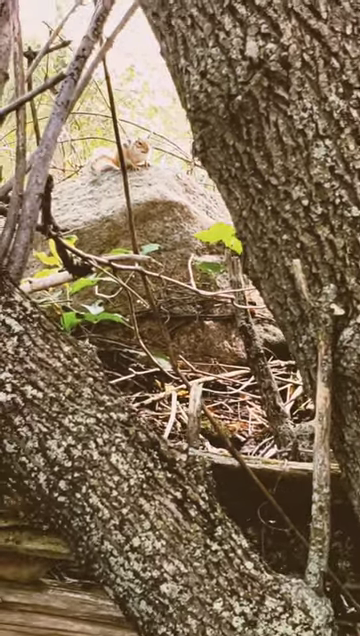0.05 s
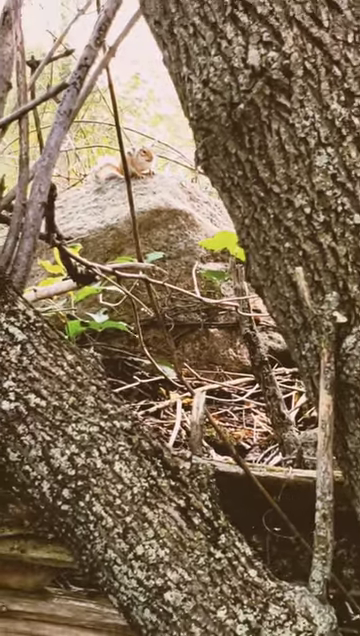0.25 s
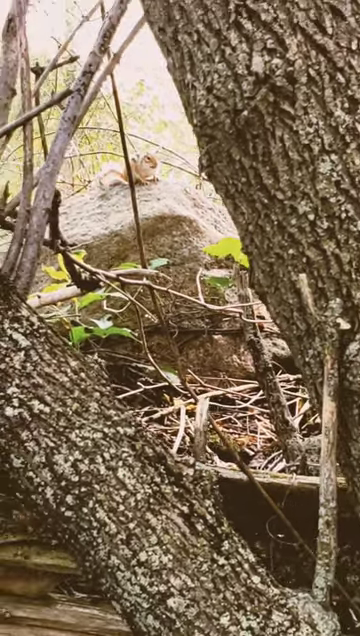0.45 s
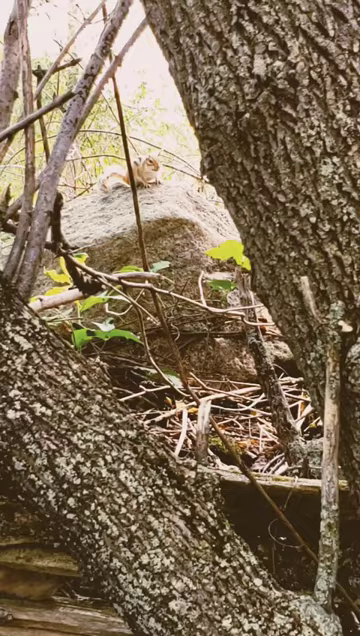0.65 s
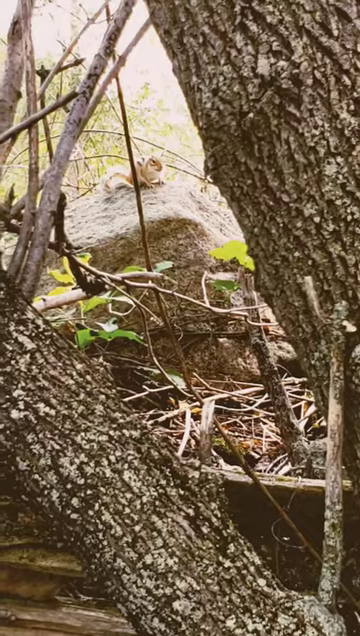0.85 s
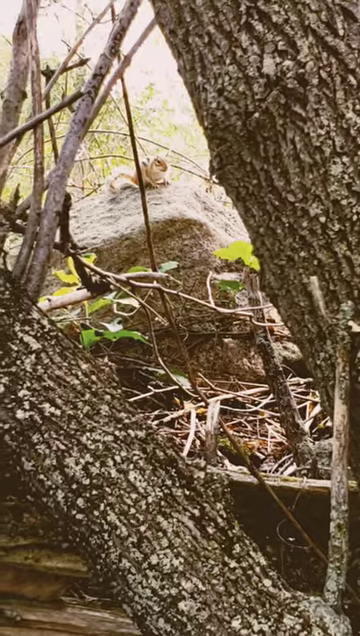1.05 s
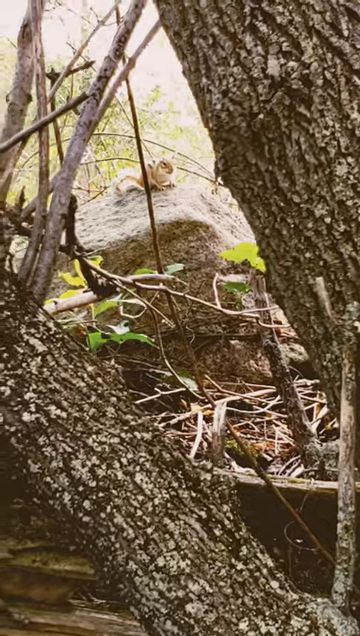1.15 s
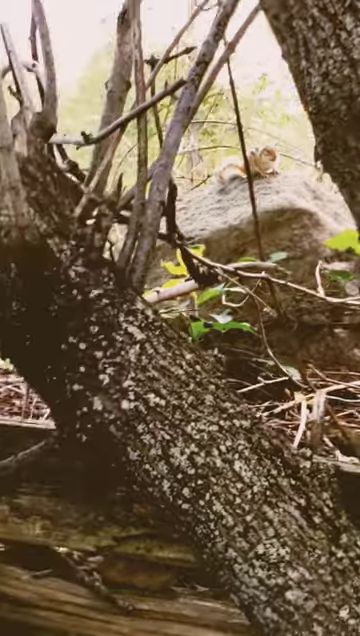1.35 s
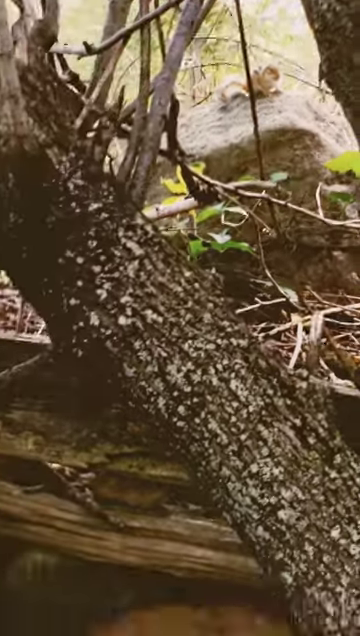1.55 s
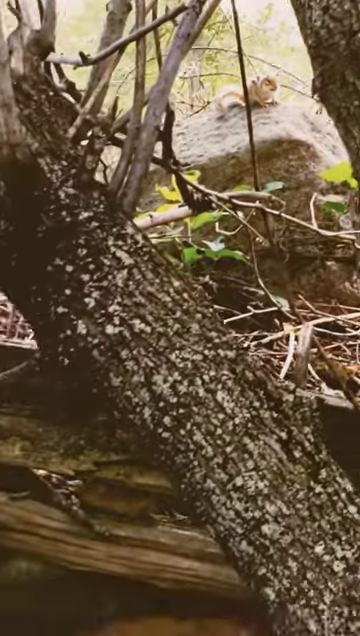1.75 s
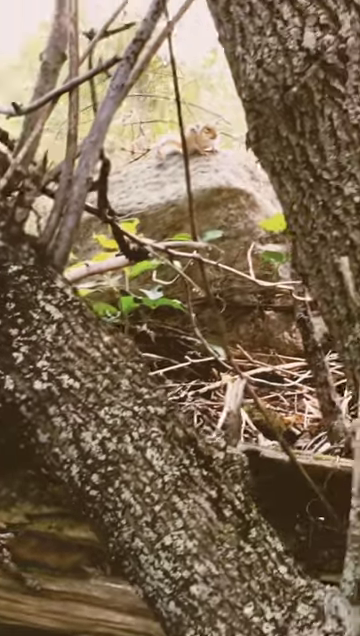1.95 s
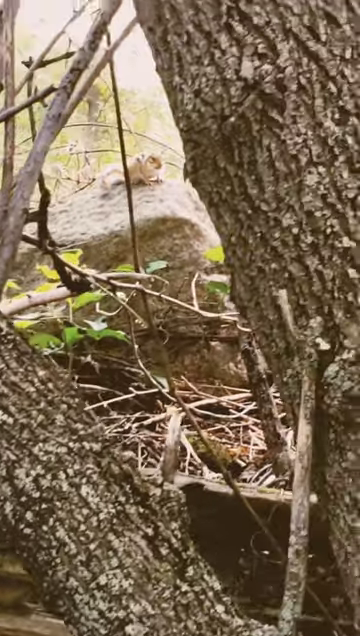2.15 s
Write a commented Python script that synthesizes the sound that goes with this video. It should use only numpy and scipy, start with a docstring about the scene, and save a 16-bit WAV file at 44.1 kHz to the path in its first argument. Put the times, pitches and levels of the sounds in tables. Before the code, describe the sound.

Five sharp chipmunk chips echo lightly through woodland, ending with a soft close rustle.

```python
"""Faint bird notes, then at once five sharp chips from a chipmunk on a woodland boulder. Each chip is a
whistle that plunges an octave in 25 ms, scattered by rock and trunks and trailed by a soft low note.
One thin squeak follows the first chip, and the distant bird keeps repeating its short notes.
Near the end something rustles close by, twigs tick and a hand bumps and scuffs the microphone,
all over a low hum and quiet forest air."""
import sys
import numpy as np
from scipy import signal
from scipy.fft import rfft, irfft
from scipy.io import wavfile
from scipy.ndimage import uniform_filter1d

SR = 44100
rng = np.random.default_rng(int(sys.argv[2]) if len(sys.argv) > 2 else 0)


def pcm_store(signal):
    """Save signal as 16-bit PCM."""
    levels = np.round(np.clip(np.atleast_2d(signal), -1, 1) * 32767)
    wavfile.write(sys.argv[1], SR, levels.astype(np.int16).T)


N = 97020

# chipmunk calls (time [s], level [dB], pitch [ratio], length [ratio])
CHIPS = [(0.2061, -18, 1.005, 1.0), (0.6267, -19.5, 1.014, 0.98), (1.0335, -18, 1, 0.99),
         (1.4302, -19, 1.005, 1.01), (1.8242, -18, 1.0, .99)]
# course of one chip (time from its start [ms], pitch [Hz], level [dB])
CHIP_CONTOUR = [(-3, 7400, -55), (1.5, 8250, -30), (3.5, 8300, -24), (9, 8000, -10), (12, 7200, 1),
                (15, 6100, -9.5), (18.5, 5150, 1), (22, 4500, -1), (25, 4152, -8.5), (28.5, 4054, -21)]
# hiss in the chipmunk's voice (frequency [Hz], level [dB])
RASP_SPECTRUM = [(300, -36), (1200, -15.5), (2200, -25.5), (3000, -20), (3700, -14), (4400, 1), (6000, -6),
                 (7700, 8.5), (9000, 0), (10500, -2.5), (12000, -25)]
# course of the squeak (time [s], pitch [Hz], level [dB])
SQUEAK_CONTOUR = [(.246, 9350, -41), (.252, 9250, -33), (.263, 9200, -30), (.273, 9550, -31),
                  (.279, 10200, -35), (0.284, 11300, -35), (.287, 8600, -45), (.297, 7050, -39),
                  (.301, 6800, -34)]
# note after each chip (time [s], level [dB], middle pitch [Hz], length [s])
LOW_NOTES = [(0.23, -52, 1223, 0.027), (0.653, -48.5, 1128, 0.024), (1.063, -50, 1100, 0.039),
             (1.462, -47, 1094, .014), (1.859, -48.5, 1030, 0.0141)]
# calls scattered by leaves and twigs (frequency [Hz], level [dB])
FOLIAGE_SPECTRUM = [(500, -45), (1100, -11), (1700, -22), (2500, -29.5), (3000, -10), (3600, -14.5),
                    (4400, 3), (6000, 8.5), (7500, -1), (9500, 1), (11000, -7.5), (12000, -26)]
# distant bird's song (time [s], length [s], top pitch [Hz], level [dB])
BIRD_NOTES = [(-.02, 0.054, 5700, -48.5), (.1, 0.032, 5460, -52.5), (0.198, 0.038, 5350, -55),
              (0.56, 0.029, 6190, -73), (0.78, 0.054, 5040, -60.5), (0.866, 0.044, 5464, -52.5),
              (0.979, .04, 4450, -62), (1.244, .04, 5370, -54), (1.347, 0.046, 5445, -52.5),
              (1.587, 0.04, 5413, -52.5), (1.723, 0.035, 5130, -57), (2.036, 0.047, 5820, -54.5)]
# hiss in its notes (frequency [Hz], level [dB])
BIRD_SPECTRUM = [(3000, -51), (4000, -11), (4600, -1), (5300, 11.5), (6100, -9), (7400, -8), (8500, -24),
                 (12000, -21)]
# envelope of the close rustle (time [s], left level [dB], right level [dB])
RUSTLE_ENVELOPE = [(1.55, -77, -67.5), (1.715, -71, -64.5), (1.74, -70, -51.5), (1.799, -69, -55),
                   (1.86, -56.5, -50), (1.92, -59, -50), (1.97, -51, -42.5), (2.005, -56, -46.5),
                   (2.02, -52, -50), (2.056, -47.5, -48), (2.12, -52.5, -49.5), (2.2, -57, -52)]
# its brushing noise (frequency [Hz], level [dB])
RUSTLE_SPECTRUM = [(100, -16), (300, 1), (550, 5.5), (850, 1.5), (1300, 1), (2000, -0.5), (3000, 2),
                   (5000, -3), (7500, 3), (10500, -2), (12000, -16)]
# faint stirring of leaves (time [s], length [s], level [dB])
LEAF_STIRS = [(0.456, 0.085, -62), (1.583, 0.13, -63)]
# their hiss (frequency [Hz], level [dB])
LEAF_SPECTRUM = [(2000, -39), (5000, -17), (7500, 2), (9500, 6), (12000, -10)]
# twig and handling ticks (time [s], level [dB], band centre [Hz], t60 [s], left minus right [dB])
TICKS = [(1.601, -43, 6300, 0.024, 6), (1.821, -39, 4900, 0.014, -13), (1.9345, -30.5, 6030, 0.0037, -9),
         (1.9376, -23, 4970, 0.0054, 13), (2.1734, -34.5, 860, 0.013, 9.5)]
# handling bumps (time [s], level [dB], pitch [Hz], t60 [s])
THUMPS = [(.764, -34.5, 88, 0.078), (1.791, -42.5, 55, 0.27), (2.194, -29.5, 104, 0.11)]
# friction of the hand (frequency [Hz], level [dB])
SCUFF_SPECTRUM = [(100, -8), (300, 3), (550, -2.5), (900, -7), (1400, -2), (2200, -29), (6000, -44)]
# partials of the hum (frequency [Hz], level [dB])
HUM_PARTIALS = [(59.2, -63), (118.4, -62.5), (215.3, -74.5)]
# forest air (frequency [Hz], level [dB])
AIR_SPECTRUM = [(20, -10), (35, -5.5), (60, 4.5), (90, -2), (160, -12.5), (300, -16), (520, -23),
                (800, -19), (1300, -33), (2200, -56.5), (3400, -40), (5000, -31), (7400, -26.5),
                (9500, -50.5), (11000, -40.5), (12000, -67)]
# low rumble (frequency [Hz], level [dB])
RUMBLE_SPECTRUM = [(20, -12), (45, 1.5), (75, 0), (150, -10), (400, -44), (2000, -78)]


def chipmunk(t):
    """Frequency modulation: each chip is a jittering, plunging whistle that rasps most where loudest."""
    ms, hz, contour_db = np.array(CHIP_CONTOUR).T
    times = ms / 1000
    rasp = undb(-11.5) * noise(RASP_SPECTRUM, channels=1)[0]
    jitter = 1 + 0.01345 * walk(1500)
    out = np.zeros(N)
    for start, db, pitch_ratio, stretch in CHIPS:
        age = (t - start) / stretch
        whistle = np.sin(phase(pitch_ratio * np.interp(age, times, hz) * jitter))
        effort = undb(np.interp(age, times, contour_db, left=-200, right=-200))
        out += undb(db) * effort * (whistle + effort / (effort + 0.25) * rasp)
    return out


def squeak(t):
    """A frequency glide: a very high, slightly hissy whistle curls upward and flicks down."""
    times, hz, db = np.array(SQUEAK_CONTOUR).T
    whistle = np.sin(phase(np.interp(t, times, hz) * (1 + 0.0044 * walk(900))))
    rasp = undb(-16.5) * noise(RASP_SPECTRUM, channels=1)[0]
    return undb(np.interp(t, times, db, left=-200, right=-200)) * (whistle + rasp)


def low_notes(t):
    """A soft downward linear sweep, roughened by random frequency modulation, trails each chip."""
    fall_hz_per_s = 9000
    out, waver = np.zeros(N), 1 + 0.1 * walk(500)
    for start, db, middle_hz, length in LOW_NOTES:
        progress = np.clip((t - start) / length, 0, 1)
        hz = middle_hz - fall_hz_per_s * length * (progress - 0.5)
        out += undb(db) * arch(progress) * np.sin(phase(waver * hz))
    return out


def woodland_echoes(calls):
    """Multipath reflection: the calls return from nearby rock, trunks, the far wood and foliage."""
    rock = echoes(calls, delay=0.0015, build=0.0015, t60=0.087, db=-2.56)
    trunks = echoes(calls, delay=0.015, build=1.07, t60=0.18, db=-13)
    # a negative t60 makes this faint echo swell until it stops, 1 s after the call
    far_wood = echoes(calls, delay=0.04, build=7, t60=-0.64, db=-29.5)
    return rock + (trunks + far_wood + foliage_scatter(calls)) * pan(2.4)


def foliage_scatter(calls):
    """Diffuse scattering: leaves and twigs blur the calls into a hiss that follows their energy."""
    age = np.arange(SR) / SR
    response = ((1 - np.exp(-age / 0.0093)) * decay(age, t60=0.24)) ** 2
    energy = np.maximum(signal.fftconvolve(calls ** 2, response / response.sum())[:N], 0)
    return undb(-12) * np.sqrt(energy) * noise(FOLIAGE_SPECTRUM)


def distant_bird(t):
    """Short notes scoop up to a held pitch; reverberation from the trees outweighs the direct sound."""
    scoop, rise_s = 0.06, 0.00684
    out, waver = np.zeros(N), 1 + 0.009 * walk(400)
    hiss = undb(-7) * noise(BIRD_SPECTRUM, channels=1)[0]
    for start, length, hz, db in BIRD_NOTES:
        age = np.maximum(t - start, 0)
        tone = np.sin(phase(hz * waver * (1 - scoop * np.exp(-age / rise_s))))
        out += undb(db) * np.sqrt(arch(age / length)) * (tone + hiss)
    trees = echoes(out, delay=0.002, build=0.0022, t60=0.32, db=1.5)
    return (undb(-2) * out + trees) * undb([[1.5], [-2]])


def ticks():
    """Impact excitation: each brief contact is a damped noise burst in a band around its own pitch."""
    edge_ratio = 1.43
    out, age = np.zeros((2, N + SR)), np.arange(SR // 10) / SR
    for start, db, hz, t60, pan_db in TICKS:
        mid, side = rng.standard_normal((2, len(age))) * decay(age, t60)
        band = signal.butter(2, [hz / edge_ratio, hz * edge_ratio], "band", fs=SR, output="sos")
        ring = signal.sosfilt(band, [mid + 0.5 * side, mid - 0.5 * side])
        onset = int(start * SR)
        out[:, onset:onset + len(age)] += ring / np.abs(ring).max() * undb(db) * pan(pan_db)
    return out[:, :N]


def thumps(t):
    """Damped oscillation: each soft handling bump is a low sinusoid that dies away."""
    out, attack_s = np.zeros(N), 0.0035
    for start, db, hz, t60 in THUMPS:
        age = np.maximum(t - start, 0)
        envelope = (1 - np.exp(-age / attack_s)) * decay(age, t60)
        out += undb(db) * envelope * np.sin(2 * np.pi * hz * age)
    return out


def rustle(t):
    """Random amplitude modulation gives grain to close brushing, first on the right, and faint leaves."""
    times, left_db, right_db = np.array(RUSTLE_ENVELOPE).T
    grain = unit_rms(undb(0.5 * walk(720) + 2.37 * walk(60.01)))
    envelope = undb([np.interp(t, times, left_db), np.interp(t, times, right_db)])
    brushing = envelope * unit_rms(flicker(noise(RUSTLE_SPECTRUM), depth_db=3, rate_hz=35.1))
    stirring = sum(undb(db) * arch((t - start) / length) for start, length, db in LEAF_STIRS)
    return grain * (brushing + stirring * noise(LEAF_SPECTRUM))


def hand_scuff(t):
    """Friction noise: a hand slides over the microphone in one dull swell."""
    start_s, length_s = 2.12, 0.098
    return undb(-54) * arch((t - start_s) / length_s) * noise(SCUFF_SPECTRUM)


def hum():
    """Superposition of three low partials, each wavering in level and pitch."""
    out = np.zeros(N)
    for hz, db in HUM_PARTIALS:
        amplitude = np.sqrt(2) * undb(db + 2 * walk(14))
        out += amplitude * np.sin(phase(hz * (1 + 0.0188 * walk(18))))
    return out


def forest_air():
    """Correlation between the ears sets width: the air is narrow in the bass and wide in the treble."""
    air = flicker(noise(AIR_SPECTRUM), depth_db=2, rate_hz=10.02)
    bass = signal.sosfilt(signal.butter(1, 960, fs=SR, output="sos"), air)
    mid, side = bass
    narrow = np.array([mid + 0.2 * side, mid - 0.2 * side]) * pan(2.2)
    wide = (air - bass) * pan(9.5)
    return undb(-59) * (narrow + wide)


def echoes(x, delay, build, t60, db):
    """Convolution with 1 s of dense random reflections, different at each ear; times in seconds."""
    age = np.maximum(np.arange(SR) / SR - delay, 0)
    tail = rng.standard_normal((2, SR)) * (1 - np.exp(-age / build)) * decay(age, t60)
    tail *= undb(db) / np.sqrt(np.sum(tail ** 2, axis=1, keepdims=True))
    return signal.fftconvolve(x[None], tail, axes=1)[:, :N]


def flicker(x, depth_db, rate_hz):
    """Independent amplitude modulation lets each octave band swell and sink."""
    octave = np.log2(np.clip(np.fft.rfftfreq(N, 1 / SR), 48, 12288) / 48)
    spectrum = rfft(x)
    bands = (irfft(spectrum * np.maximum(1 - np.abs(octave - k), 0), N) for k in range(9))
    return sum(band * undb(depth_db * walk(rate_hz)) for band in bands)


def noise(spectrum, channels=2):
    """Spectral shaping of uncorrelated noises by relative levels, scaled to rms 1."""
    hz, db = np.array(spectrum).T
    bins_hz = np.maximum(np.fft.rfftfreq(N, 1 / SR), 1)
    gain = undb(np.interp(np.log(bins_hz), np.log(hz), db))
    return unit_rms(irfft(rfft(rng.standard_normal((channels, N))) * gain, N))


def walk(rate_hz):
    """Moving averages smooth random steps into a fluctuation of rms 1."""
    hold = max(int(SR / rate_hz), 2)
    steps = np.repeat(rng.standard_normal(N // hold + 1), hold)
    return unit_rms(uniform_filter1d(uniform_filter1d(steps, hold), hold)[:N])


def phase(hz):
    """Phase is the time integral of frequency."""
    return 2 * np.pi * np.cumsum(hz) / SR


def arch(progress):
    """Half-sine swell as progress goes from 0 to 1."""
    return np.sin(np.pi * np.clip(progress, 0, 1))


def decay(age, t60):
    """Exponential damping by 60 dB every t60 seconds."""
    return np.exp(-np.log(1000) * age / t60)


def pan(db):
    """Gains for an interaural level difference, left minus right."""
    return undb([[db / 2], [-db / 2]])


def undb(db):
    """Decibels to amplitude ratio."""
    return 10 ** (np.asarray(db) / 20)


def unit_rms(x):
    """Normalisation to rms 1."""
    return x / np.sqrt(np.mean(x ** 2))


def scene():
    """Superposition of direct calls, their echoes, the bird, close sounds and the background."""
    t = np.arange(N) / SR
    chips, trailing_calls = chipmunk(t), low_notes(t) + squeak(t)
    direct = (chips + trailing_calls) * undb([[-5.5], [-1]])  # louder on the right
    reflected = woodland_echoes(chips + undb(-1.5) * trailing_calls)
    close = hand_scuff(t) + ticks() + thumps(t) + rustle(t)
    background = hum() + forest_air() + undb(-64) * noise(RUMBLE_SPECTRUM)
    return direct + reflected + distant_bird(t) + close + background


def record(dry):
    """An elliptic low-pass filter cuts the highest treble steeply."""
    cutoff_hz = 11650
    return signal.sosfilt(signal.ellip(10, 0.2, 70, cutoff_hz, fs=SR, output="sos"), dry)


dry = scene()
out = record(dry)
pcm_store(out)
```